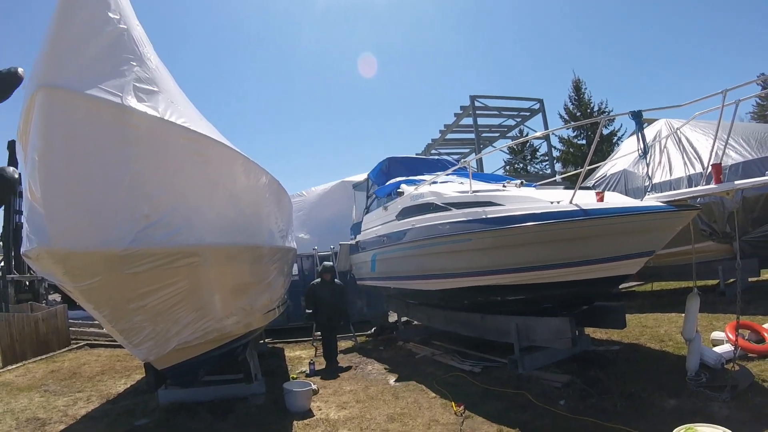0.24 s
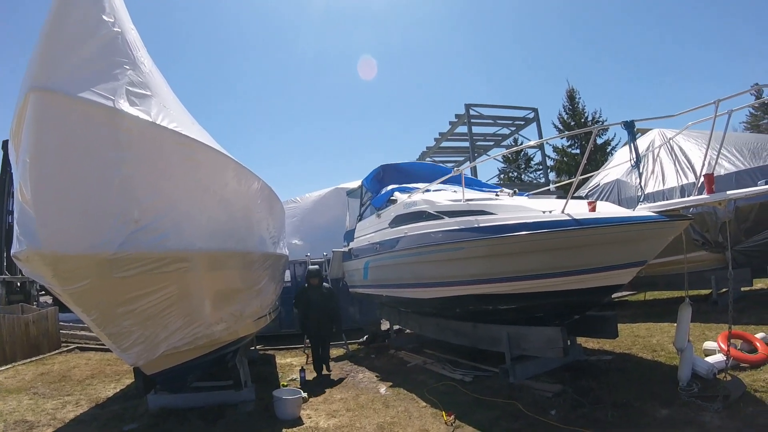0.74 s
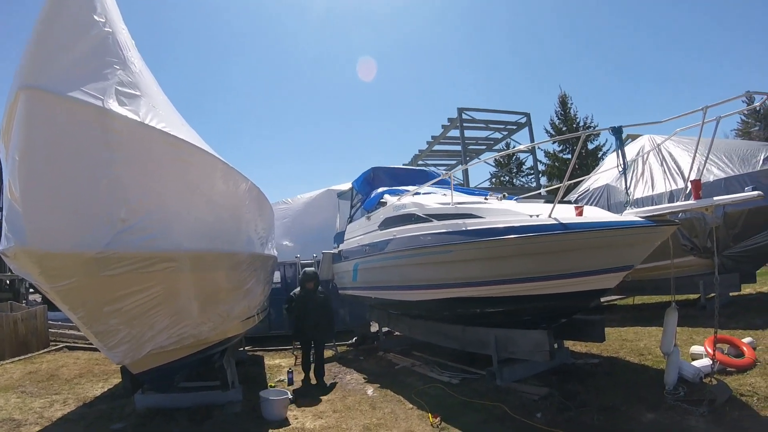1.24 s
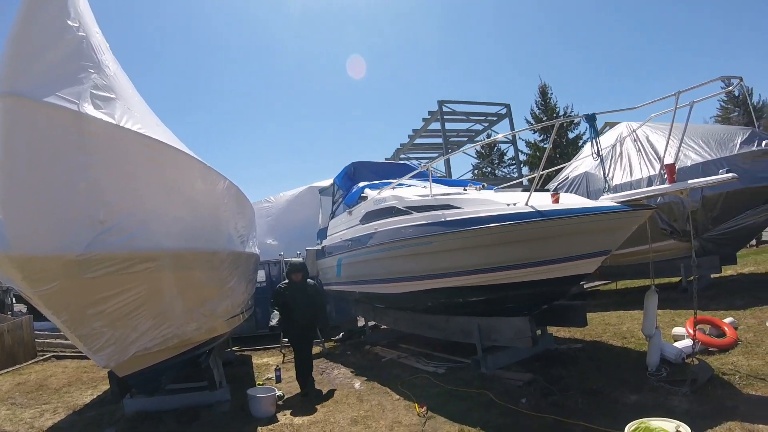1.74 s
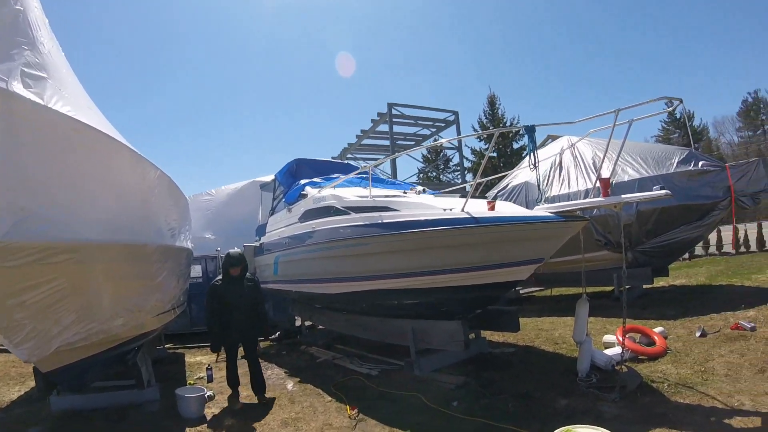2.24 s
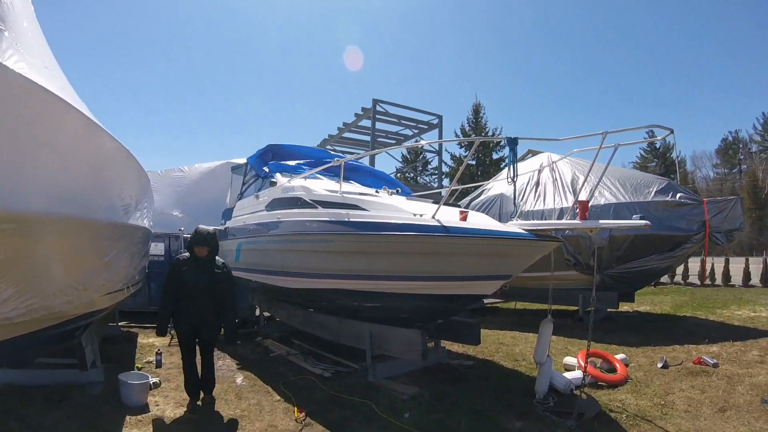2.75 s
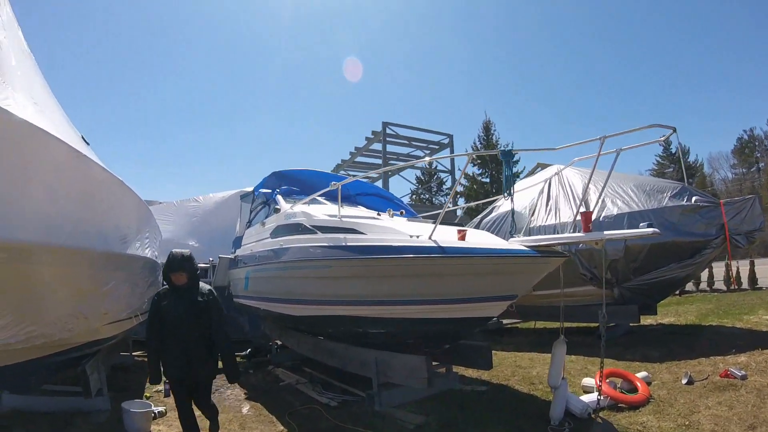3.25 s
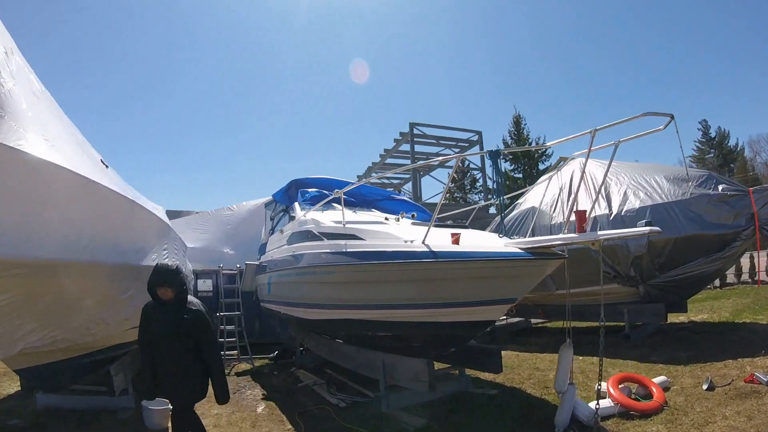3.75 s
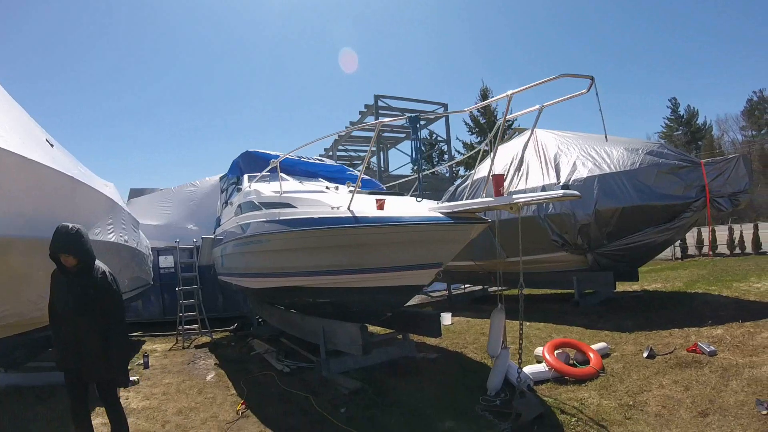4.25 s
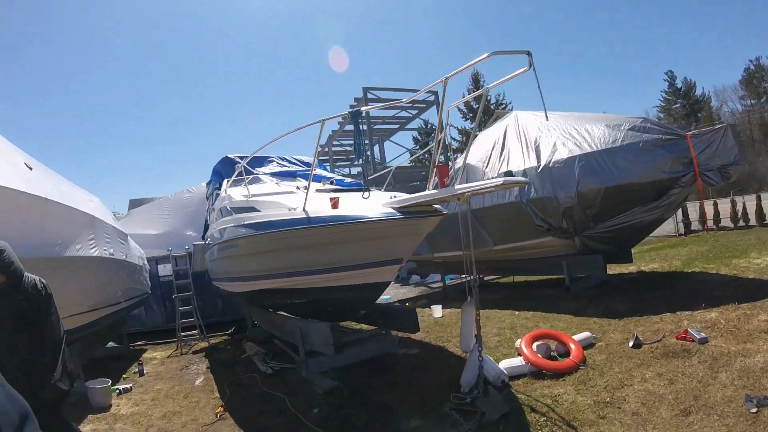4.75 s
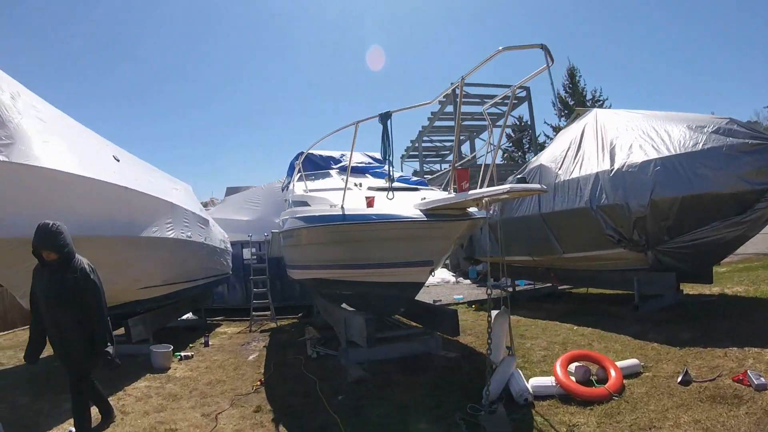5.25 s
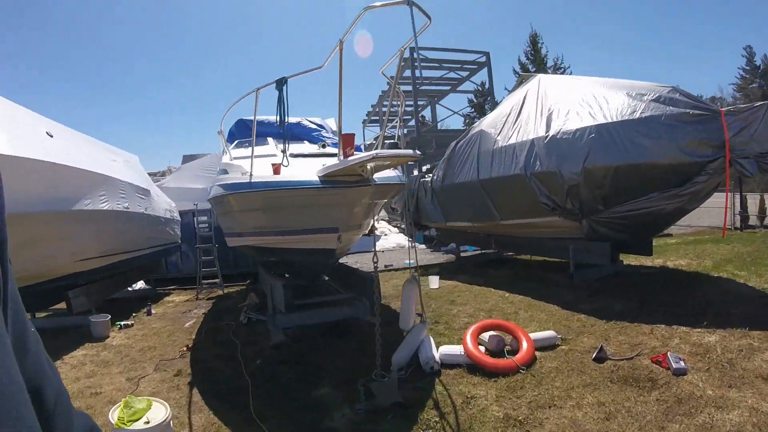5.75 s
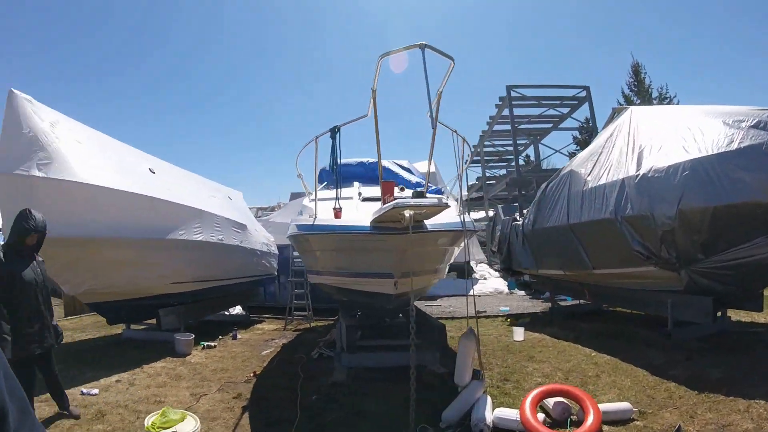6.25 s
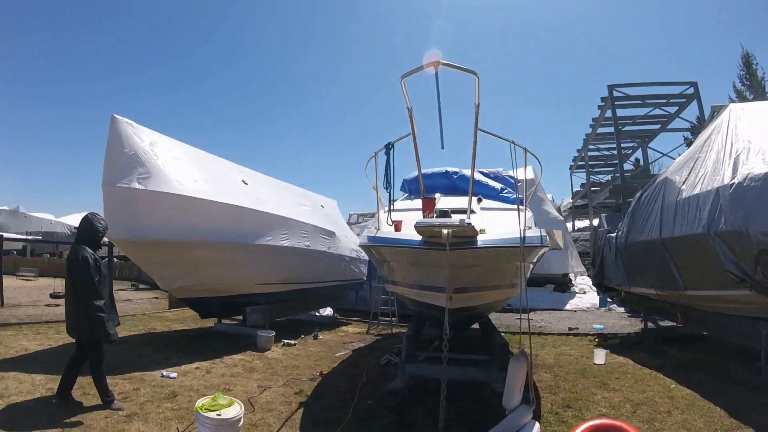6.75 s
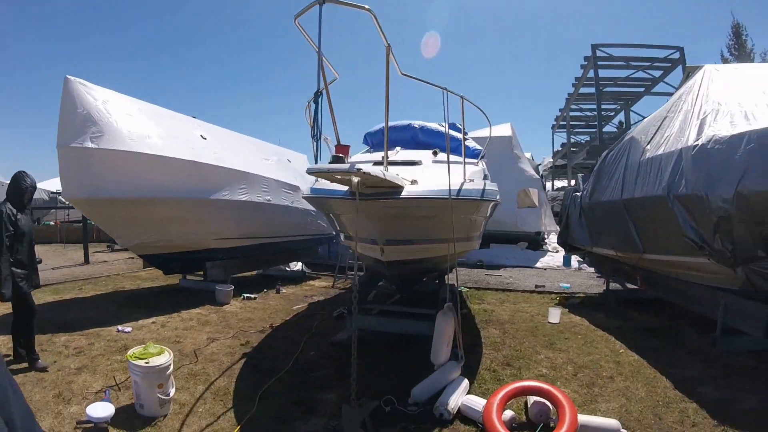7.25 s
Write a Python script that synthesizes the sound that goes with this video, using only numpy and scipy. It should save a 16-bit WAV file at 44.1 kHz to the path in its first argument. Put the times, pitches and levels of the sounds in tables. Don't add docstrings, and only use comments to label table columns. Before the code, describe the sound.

A rotary power tool hums and whines continuously outdoors, first half buried by violent wind buffeting, later clearer and closer with faint ticks.

```python
import sys
import numpy as np
from scipy import signal
from scipy.io import wavfile
from scipy.ndimage import uniform_filter1d

SR = 44100
rng = np.random.default_rng(int(sys.argv[2]) if len(sys.argv) > 2 else 0)


def invert_db(level):
    return 10 ** (np.asarray(level, dtype=float) / 20)


def store_wav(level_fs):
    pcm = np.round(np.clip(np.atleast_2d(level_fs), -1, 1) * 32767)
    wavfile.write(sys.argv[1], SR, pcm.T.astype(np.int16))


N = 331191
STEP = 40
CONTROL_S = np.arange(N // STEP + 2) * STEP / SR

# [s, Hz]
SPEED = [(0, 34.154), (0.25, 34.154), (0.75, 34.198), (1.25, 34.164), (1.75, 34.148), (2.25, 34.136),
         (2.75, 34.204), (3.25, 34.218), (3.75, 34.213), (4.25, 34.266), (4.75, 34.306), (5.25, 34.334),
         (5.75, 34.29), (6.25, 34.148), (6.75, 34.275), (7.25, 34.245), (7.51, 34.24)]
# start_s, pressure [full scale], pitch_hz [Hz]
CRACKS = [(0.0585, 0.16, 489), (0.3379, -0.04, 335), (0.5311, -0.23, 339), (0.5388, -0.097, 300),
          (0.5574, 0.17, 380), (0.5957, -0.22, 430), (0.7107, 0.24, 334), (0.7179, -0.22, 302),
          (0.7338, 0.13, 430), (0.7912, 0.22, 302), (0.7973, -0.23, 300), (0.8102, -0.18, 489),
          (0.8215, -0.054, 489), (0.8288, 0.31, 339), (0.834, 0.25, 380), (0.8413, -0.29, 383),
          (0.858, -0.21, 433), (0.8633, 0.033, 383), (0.8707, -0.16, 300), (0.8902, 0.16, 300),
          (0.8961, -0.12, 383), (0.9102, -0.1, 383), (0.9168, -0.33, 300), (0.9338, -0.12, 339),
          (0.939, 0.17, 339), (0.9583, -0.18, 383), (0.9694, -0.21, 300), (1.0181, 0.24, 383),
          (1.042, 0.2, 383), (1.088, -0.41, 339), (1.1029, -0.35, 385), (1.1104, 0.24, 489),
          (1.1202, 0.27, 383), (1.1574, 0.28, 339), (1.1624, -0.22, 300), (1.1698, -0.24, 339),
          (1.1834, -0.22, 489), (1.2057, -0.16, 339), (1.212, -0.15, 335), (1.3544, 0.15, 303),
          (1.5023, 0.12, 339), (1.946, -0.12, 383), (1.9512, -0.29, 339), (1.9782, 0.12, 624),
          (2.0971, 0.1, 339), (2.1048, -0.26, 322)]


def rms_one(x):
    return x / np.sqrt(np.mean(x ** 2) + 1e-20)


def full(control):
    return np.interp(np.arange(N) / STEP, np.arange(len(control)), control)


def in_time(rows):
    s, *columns = np.transpose(rows)
    return [np.interp(CONTROL_S, s, column) for column in columns]


def drift(rate_hz):
    r = np.exp(-2 * np.pi * STEP * rate_hz / SR)
    noise = rng.standard_normal(N // STEP + 4002)
    return rms_one(signal.lfilter([1], [1, -2 * r, r * r], noise)[4000:])


def swells(events, rise_db_per_s, fall_db_per_s, rest_db):
    power = invert_db(2 * rest_db)
    for s, length_s, level_db in events:
        early = rise_db_per_s * np.maximum(s - CONTROL_S, 0)
        late = fall_db_per_s * np.maximum(CONTROL_S - s - length_s, 0)
        power = power + invert_db(2 * (level_db - early - late))
    return 10 * np.log10(power)


def bump(hz, centre_hz, octaves):
    return np.exp(-(np.log2(hz / centre_hz) / octaves) ** 2)


def filtered(x, order, hz, kind="low"):
    return signal.sosfilt(signal.butter(order, hz, kind, fs=SR, output="sos"), x)


def evened(x, samples):
    return x / np.sqrt(uniform_filter1d(x ** 2, size=samples))


def resonance(x, hz, width_hz):
    r = np.exp(-np.pi * width_hz / SR)
    poles = [1, -2 * r * np.cos(2 * np.pi * hz / SR), r * r]
    return signal.lfilter([(1 - r * r) / 2, 0, (r * r - 1) / 2], poles, x + 1e-18)


def bands(edges):
    white = rng.standard_normal((2, N))
    for k, (low, high) in enumerate(zip(edges, edges[1:])):
        yield np.sqrt(low * high), filtered(white[k % 2], 2, [low, high], "band")


def pings(events, cycles, rise, trim_db):
    out = np.zeros(N)
    for s, peak_db, hz in events:
        t = np.arange(1, int(8 * cycles / hz * SR)) * hz / SR / cycles
        shape = t ** rise * np.exp(-t - t ** 2 * rise)
        burst = invert_db(peak_db + trim_db) * shape / shape.max() * np.sin(2 * np.pi * t * cycles)
        at = round(s * SR)
        out[at:at + len(t)] -= burst[:N - at]
    return out


def pressure_crests(events):
    out = np.zeros(N)
    for s, pressure, hz in events:
        at = np.arange(-900, 900) + round(s * SR)
        cycle = (at / SR - s) * hz
        out[at] += pressure * np.exp(-(cycle / 0.59) ** 2) * np.cos(2 * np.pi * cycle)
    return out


def hull_echo(middle_s, spread_s, before_db, after_db):
    return before_db + (after_db - before_db) * (1 + np.tanh((CONTROL_S - middle_s) / spread_s)) / 2


def hulls_db(hz):
    # [s, s, dB]
    exposed = [
        (3.0, 0.56, -18),
        (5.02, .25, -3.5),
        (5.68, 0.34, 3),
        (6.15, 0.27, -12),
    ]
    # [s, s, dB, Hz, octaves]
    passing_colours = [(4.7, 1.9, 8.5, 2980, 0.083), (3.9, 0.96, 4.5, 3650, 0.097), (4.9, 2.3, 1.5, 3860, 0.029),
                       (6.8, .9, 14, 5080, 0.038), (2.3, 0.92, 3.5, 1840, .15), (5.6, 1.1, 0.5, 1620, 0.051),
                       (4.5, 1.5, 2.5, 920, 0.1), (6.2, 0.99, -5.5, 1310, 0.035), (6.1, 0.45, 3, 1660, .15),
                       (6.6, 1.1, 3, 600, 0.23), (4.35, 1.06, -7.5, 764, .12), (1.2, 1.4, -11.5, 1000, 0.11),
                       (1.9, 1.2, 3, 700, 0.16), (6.7, 0.54, 2.5, 960, .04), (9.3, 0.43, 1.5, 68, .3),
                       (5.7, .9, 3, 2400, 0.16), (6.9, 0.56, -4, 1600, 0.15), (3.6, .8, 4, 1700, 0.12),
                       (2.27, 0.7, 3, 68, .3), (3.5, .3, 2.5, 68, .3), (4.1, 0.23, 1.5, 68, .3),
                       (6.3, .7, 3.5, 345, .1), (2.35, 0.69, -3.5, 280, .15), (4.8, .4, 7, 790, .06),
                       (5.95, 0.45, -5, 2740, .02), (5.74, 0.62, -1.5, 68, .3), (7.1, .5, -0.5, 690, .03)]
    boom_db = hull_echo(7, 0.78, -4.5, 15)
    hollow_db = hull_echo(6.5, 2, 14.5, -20.5)
    exposure_db = swells(exposed, 51, 51, rest_db=-7.5)
    colour_db = bump(hz, 645, 0.68) * boom_db + bump(hz, 774, 0.1) * hollow_db
    colour_db = colour_db + bump(hz, 1463, 0.13) * exposure_db
    for s, length_s, level_db, centre_hz, octaves in passing_colours:
        inside_s = np.minimum(CONTROL_S - s, s + length_s - CONTROL_S)
        presence = np.clip(inside_s / 0.22 + 0.5, 0, 1)
        colour_db = colour_db + bump(hz, centre_hz, octaves) * level_db * presence
    return colour_db


def yard_clicks():
    # [s, dB, Hz]
    ticks = [
        (0.0002, -35, 10900),
        (0.2304, -50, 2590),
        (2.1261, -49, 3460),
        (2.4783, -36, 2610),
        (2.7403, -32, 3600),
        (4.2592, -40, 3600),
        (4.6976, -32.5, 3600),
        (5.1063, -39, 2740),
        (6.3305, -32, 3020),
        (7.3517, -36, 3260),
    ]
    # [s, dB, Hz]
    clink = [
        (6.9381, -42, 5240),
    ]
    return pings(ticks, cycles=5, rise=0.1, trim_db=-4) + pings(clink, cycles=90, rise=0.05, trim_db=-4)


def wind_strength():
    # [s, s, dB, dB]
    gusts = [(0.03, 0.037, -19.5, -28), (0.152, 0.03, -18.5, -31), (0.282, 0.083, -12.5, -23.5),
             (0.52, 0.032, -5.5, -23), (0.58, 0.1, -12.5, -40), (0.696, 0.036, -12, -22.5),
             (0.796, 0.091, -11, -25), (0.89, 0.068, -9, -28), (1.048, 0.12, -6.5, -19),
             (1.34, 0.042, -14.5, -30), (1.47, 0.028, -21.5, -29), (1.543, 0.16, -30, -32),
             (1.79, 0.14, -21, -29), (1.94, 0.042, -18, -26), (2.031, 0.072, -14.5, -44),
             (2.172, 0.078, -16, -25), (2.5, 0.15, -35, -38), (3.078, 0.057, -16.5, -29.5),
             (3.19, 0.055, -19, -30), (3.378, 0.21, -33, -31.5), (4.15, 0.028, -32, -28),
             (4.493, 0.021, -27, -31), (5.464, 0.13, -23.5, -31), (5.65, 0.046, -26, -31),
             (5.797, 0.058, -22, -28), (5.98, 0.065, -29.5, -28), (6.303, 0.052, -25, -34),
             (6.445, 0.1, -22, -28), (6.604, 0.022, -19, -22.5), (7.194, 0.027, -39, -29.5)]
    # [s, dB]
    breeze = [
        (0, -37),
        (1.3, -30.5),
        (2.3, -32.5),
        (2.6, -33.5),
        (3.3, -35.5),
        (4.0, -37.5),
        (5.1, -34),
        (5.6, -34),
        (6.7, -32),
        (7.51, -37.5),
    ]
    breeze_db, rows = in_time(breeze)[0], np.array(gusts)
    buffet_db = swells(rows[:, :3], 500, 356, breeze_db)
    thud_rest_db = breeze_db - 4 + 2.5 * drift(3.0)
    thud_db = swells(np.delete(rows, 2, axis=1), 445, 355, thud_rest_db)
    slope_db = -14 - 1.4 * np.maximum(buffet_db - breeze_db, 0)
    slope_db = slope_db + 2 * np.maximum(buffet_db + 22, 0)
    return buffet_db, thud_db, slope_db + 1.5 * drift(13.0)


def wind():
    buffet_db, thud_db, slope_db = wind_strength()
    lumps, snaps = drift(35.0), np.clip(drift(70.0), -2, 1.3)
    buffet, thud = 0, 0
    for hz, noise in bands(16 * 2 ** np.arange(0, 6.6, 0.5)):
        sharp = np.log2(1 + (hz / 210) ** 3) / 3
        treble_db = np.minimum(slope_db, -13.5) * sharp + 3.9 * sharp * snaps
        shape_db = (hz > 60) * (treble_db + 2.6 * bump(hz, 160, 1.0)) + 3.5 * drift(24.0)
        band = full(invert_db(shape_db)) * noise
        buffet, thud = buffet + (hz > 60) * band, thud + (hz <= 60) * band
    buffet = evened(filtered(buffet, 3, 1150), 1300)
    thud = full(invert_db(np.minimum(thud_db, -17) + 1.5)) * evened(thud, 3000)
    buffet_db = buffet_db - 0.48 * np.maximum(buffet_db + 22.5, 0)
    return full(invert_db(buffet_db - 4.5 + 1.56 * lumps)) * buffet + filtered(thud, 4, 85)


def slaps():
    # [s, full scale, Hz]
    hard_slaps = [(0.0603, 0.2, 127), (0.2803, 0.044, 115), (0.3007, 0.2, 59.3), (0.3252, 0.094, 59.4),
                  (0.3379, -0.23, 143), (0.3525, -0.096, 91.5), (0.4998, 0.37, 215), (0.5116, 0.36, 142),
                  (0.5214, -0.5, 142), (0.532, -0.46, 127), (0.5424, 0.46, 114), (0.5528, -0.042, 92),
                  (0.627, -0.14, 103), (0.7186, -0.062, 143), (0.81, -0.47, 175), (0.8221, -0.87, 175),
                  (0.8293, 0.42, 114), (0.8382, -0.9, 174), (0.8436, -0.28, 158), (0.8507, 0.35, 127),
                  (0.857, -0.8, 217), (0.8628, -0.65, 83), (0.875, -0.29, 127), (0.8897, -0.075, 114),
                  (0.9181, -0.28, 103), (0.941, 0.31, 103), (0.9639, -0.29, 127), (0.973, 0.43, 92),
                  (1.037, -0.24, 127), (1.0482, 0.24, 195), (1.0637, 0.36, 217), (1.0768, 0.3, 60),
                  (1.0841, -0.62, 157), (1.0944, -0.3, 157), (1.101, -0.24, 60), (1.112, -0.1, 60),
                  (1.1186, -0.32, 175), (1.129, 0.34, 114), (1.1424, -0.26, 175), (1.1523, -0.38, 175),
                  (1.1578, -0.85, 83), (1.169, 0.48, 92), (1.1837, -0.48, 114), (1.1941, -0.38, 127),
                  (1.452, 0.27, 180), (1.494, -0.21, 60), (1.544, -0.15, 74), (1.5964, 0.14, 60),
                  (1.854, 0.2, 103), (1.8864, -0.15, 114), (1.9447, -0.24, 60), (1.9649, -0.11, 60),
                  (1.9773, 0.28, 158), (2.0884, -0.084, 67.4), (2.192, -0.13, 142), (2.2281, 0.13, 60)]
    # [s, full scale, Hz]
    flicks = [(1.362, -0.07, 520), (1.392, 0.067, 475), (1.679, 0.041, 417), (2.003, 0.066, 450),
              (2.084, 0.12, 240), (2.2, 0.11, 270), (2.216, -0.097, 280), (2.237, -0.12, 270),
              (2.247, .14, 260), (2.262, -0.069, 278), (6.609, -0.091, 200)]
    # [s, full scale, Hz]
    pushes = [(3.1047, 0.15, 69.4), (3.1294, -0.25, 124), (3.1473, 0.19, 111), (3.1986, -0.05, 55),
              (3.2249, 0.047, 55), (3.408, -0.15, 78), (4.1651, -0.015, 62), (5.3603, -0.01, 62),
              (5.5129, 0.025, 78), (5.5539, 0.028, 88), (5.6877, 0.056, 124), (5.7243, -0.13, 78),
              (5.8048, -0.055, 55), (6.0054, -0.092, 62), (6.0374, 0.14, 62), (6.1826, 0.1, 62),
              (6.2288, 0.063, 62), (6.327, -0.081, 55), (6.3453, 0.069, 68), (6.448, 0.073, 161),
              (6.523, 0.011, 55), (6.6138, 0.27, 140), (6.7837, 0.098, 62), (7.222, 0.063, 62)]
    return pressure_crests(hard_slaps + CRACKS + flicks + pushes)


def torn_edges():
    # [s, dB]
    spikes = [(0.056, -39), (0.533, -37), (0.595, -33), (0.726, -38), (0.776, -35), (0.81, -35),
              (0.839, -25), (0.859, -29), (0.87, -30), (0.937, -30), (0.957, -31), (1.018, -32),
              (1.046, -27), (1.091, -24), (1.123, -33), (1.162, -33), (1.184, -32), (1.976, -28)]
    edges = [(s, 20 * np.log10(abs(pressure)), 1.78 * hz) for s, pressure, hz in CRACKS]
    tears = [(s, peak_db, 930) for s, peak_db in spikes]
    out = pings(edges, cycles=0.43, rise=0.28, trim_db=-17)
    return out + pings(tears, cycles=0.9, rise=0.33, trim_db=4)


def flutter():
    # [s, dB]
    gust_pops = [(.056, -17), (0.336, -15), (0.495, -24), (0.533, -21), (0.555, -20), (.593, -12.5),
                 (.643, -23), (0.722, -14), (0.776, -15), (0.809, -30), (0.837, -8), (0.856, -8.5),
                 (0.894, -27), (0.915, -20), (0.933, -24), (0.955, -20.5), (1.015, -12), (1.042, -19),
                 (1.121, -24), (1.087, -8), (1.159, -29), (1.183, -11), (1.353, -24), (1.385, -21.5),
                 (1.498, -21.5), (1.909, -16.5), (1.947, -18), (1.93, -25), (1.976, -13), (2.044, -31),
                 (2.101, -31), (2.06, -24), (2.196, -27), (2.24, -34)]
    puffs = [(s, 0.0038, peak_db - 12.5) for s, peak_db in gust_pops]
    level_db = swells(puffs, 1501, 700, rest_db=-79)
    air = filtered(rng.standard_normal(N), 3, [210, 540], "band")
    return full(invert_db(level_db)) * evened(air, 500)


def panel():
    # [s, s, dB]
    panel_fits = [(0.0, 0.053, -56), (0.26, 0.18, -55), (0.65, 0.13, -57), (1.39, .03, -61),
                  (1.63, .2, -59), (2.06, 0.11, -56), (2.24, 0.069, -54.5), (2.44, 0.29, -58.5),
                  (3.0, 0.38, -57), (4.19, 0.2, -56), (4.45, 0.2, -55.5), (4.66, 0.079, -53),
                  (4.79, .05, -57), (5.05, 0.073, -53.5), (5.33, .05, -63), (5.73, 0.17, -48.5),
                  (5.93, .06, -57), (6.07, 0.26, -55), (6.44, 0.18, -53.5), (6.69, 0.18, -53.5),
                  (6.95, 0.19, -53.5), (7.225, 0.045, -53), (7.34, 0.08, -50.5), (7.48, 0.05, -47)]
    tone = resonance(resonance(rng.standard_normal(N), 2163, 25), 2163, 25)
    tone /= np.sqrt(uniform_filter1d(tone ** 2, size=900) + 0.07 * np.mean(tone ** 2))
    return full(invert_db(swells(panel_fits, 408, 252, rest_db=-62.5))) * tone


def cooling_air(turns, casing_db):
    # [Hz, dB per Hz]
    air_spectrum = [(250, -11.5), (400, -13), (560, -20), (900, -26.5), (1200, -20.5), (1700, -25.5),
                    (2300, -30), (3600, -35.5), (4300, -37), (6500, -36.5), (7200, -37.5), (9000, -43),
                    (10400, -49), (12600, -43), (13600, -51.5), (14600, -71)]
    throb_db = 1.34 * np.cos(2 * np.pi * (turns - 0.85)) + 0.86 * np.cos(4 * np.pi * (turns - 0.94))
    hz_points, db_points = np.transpose(air_spectrum)
    out, top, together = 0, 0, drift(1.5)
    for hz, noise in bands(220 * 2 ** np.arange(0, 6.1, 0.25)):
        near = 1 / (1 + (hz / 7500) ** 6)
        level_db = np.interp(np.log(hz), np.log(hz_points), db_points) + hulls_db(hz)
        level_db = level_db + near * (casing_db + 58.5 + 0.5 * together + 0.67 * drift(19.0))
        band = full(invert_db(level_db)) * noise
        out, top = out + near * band, top + (1 - near) * band
    return invert_db(-16.5) * (invert_db(throb_db) * out + top)


def knocks(turns, casing_db):
    # [share of a turn, dB]
    contacts = [
        (0.102, -15),
        (0.379, -5.5),
        (.45, 2.5),
        (0.681, 4),
        (0.759, 4),
        (0.942, 1),
    ]
    # [Hz, Hz, dB]
    casing_modes = [(1112, 94, -12), (1527, 116, -6.5), (1633, 24, -22), (1711, 88, -15.5),
                    (2463, 130, -17), (2740, 170, -24), (3020, 230, -22), (3660, 910, -12), (3920, 82, -23),
                    (4630, 440, -18.5), (5300, 110, -22), (5570, 84, -18), (6000, 69, -22.5),
                    (6470, 270, -17.5)]
    clicks, whole = np.zeros(N), np.arange(int(turns[-1]) - 1)
    for share, level_db in contacts:
        luck = rng.standard_normal((len(whole), 2))
        at = np.searchsorted(turns, whole + share + 0.0011 * luck[:, 0])
        clicks[at] += invert_db(level_db + 4.6 * luck[:, 1])
    drive = rms_one(clicks) + invert_db(1.0) * rng.standard_normal(N)
    out = 0
    for k, (hz, width_hz, level_db) in enumerate(casing_modes):
        mode_db = casing_db + level_db + hulls_db(hz) + 1.8 * drift(1.8)
        gain = invert_db(mode_db) / np.sqrt(width_hz / SR)
        ring = resonance(resonance(drive, hz, width_hz * 0.89), hz, width_hz * 0.89)
        out = out + (-1) ** k * full(gain) * ring
    return invert_db(0.5) * out


def orders(turns, table, level_db, wander_db):
    strokes = [
        (.182, -1),
        (.203, .23),
        (.395, .16),
        (.683, .79),
    ]
    share, weight = np.transpose(strokes)
    out = 0
    for k, order_db in table:
        swell_db = wander_db + 0.079 * np.clip(-order_db, 0, 18)
        gain = invert_db(level_db + order_db + hulls_db(k * SPEED[0][1]) + swell_db * drift(3.2))
        start = np.angle(np.sum(weight * np.exp(-2j * np.pi * k * share)))
        phase = 2 * np.pi * k * turns + start + full(0.12 * drift(5.0))
        out = out - full(gain) * np.cos(phase)
    return np.sqrt(2) * out


def gear_whine(turns, whine_db):
    # [turns, dB re whine]
    gear_lines = [(30, -27), (32, -9.5), (33, -21.5), (34, -24), (35, -21), (36, 2), (37, -23), (40, -36),
                  (43, -19), (44, -20), (45, -23), (47, -10), (48, -31), (52, -19.5), (72, -23), (76, -21),
                  (80, -17), (100, -24)]
    return orders(turns, gear_lines, whine_db, wander_db=1.04)


def shaft_drone(turns, near_db):
    # [turns, dB re drone]
    drone_lines = [(1, -11.5), (2, 4.5), (3, -9), (4, 0), (5, -2.5), (6, 0), (7, -14), (8, -1), (9, -7),
                   (10, -11.5), (11, -17.5), (12, -17), (13, -16), (14, -30), (15, -37), (16, -22),
                   (17, -27), (18, -25), (19, -29.5), (20, -21), (21, -43), (22, -27), (23, -31.5),
                   (24, -28.5), (25, -30), (26, -52), (28, -23.5), (38, -15.5)]
    return orders(turns, drone_lines, near_db - 3.5, wander_db=1.34)


def machine():
    # [s, dB, dB]
    walk = [(0, -35.5, -52), (1, -36, -50), (1.8, -38, -51), (2.3, -36, -49.5), (2.9, -34.5, -49),
            (3.4, -35, -50), (3.9, -34.5, -46.5), (4.4, -32, -47), (4.85, -32, -44), (5.3, -31, -43.5),
            (6.0, -29.5, -43), (6.4, -30, -43.5), (6.75, -30.5, -46.5), (7.2, -31, -51.5), (7.51, -32, -56)]
    turns = np.cumsum(full(in_time(SPEED)[0])) / SR
    near_db, whine_db = in_time(walk)
    casing_db = -54.5 + 0.58 * (near_db + 36)
    out = panel() + cooling_air(turns, casing_db) + knocks(turns, casing_db)
    return out + gear_whine(turns, whine_db) + shaft_drone(turns, near_db)


def scene():
    gusty_air = wind() + slaps() + torn_edges() + flutter()
    return (yard_clicks() + gusty_air + machine())[None]


def thin_top(x):
    padded = np.pad(x, ((0, 0), (0, 4096)), "reflect")
    hz, s, cells = signal.stft(padded, SR, "cosine", nperseg=2048)
    size = abs(cells)
    share = 1.25 / (1 + (8300 / (hz + 1)) ** 10)
    kept = size > share[:, None] * np.sqrt(np.mean(size ** 2, axis=-1, keepdims=True))
    return signal.istft(cells * np.where(kept, 1, 0.1), SR, "cosine", nperseg=2048)[1][..., :N]


def roll_off(x):
    return signal.sosfilt(signal.butter(12, 14900, fs=SR, output="sos"), x)


def record(dry):
    t = np.arange(N) / SR
    x = filtered(dry, 2, 19, "high")
    x = x * np.interp(t, [N / SR - 0.004, N / SR], [1, 0.25])
    x = filtered(thin_top(0.69 * np.tanh(x / 0.95)), 10, 13600)
    x = x + invert_db(-102) * np.sin(2 * np.pi * 14766 * t)
    return roll_off(x)


dry = scene()
out = record(dry)
store_wav(out)
```